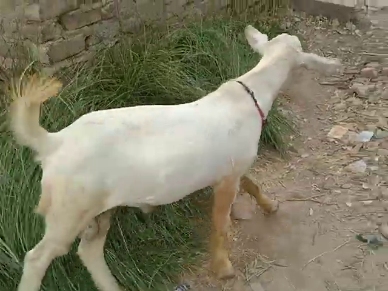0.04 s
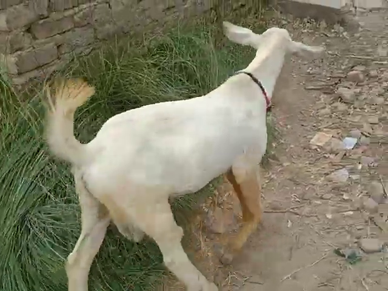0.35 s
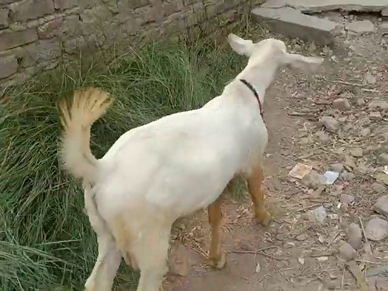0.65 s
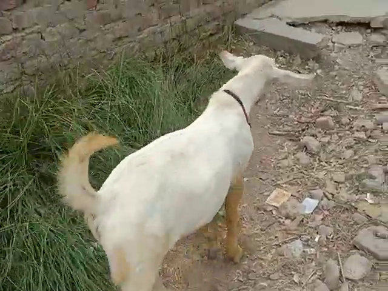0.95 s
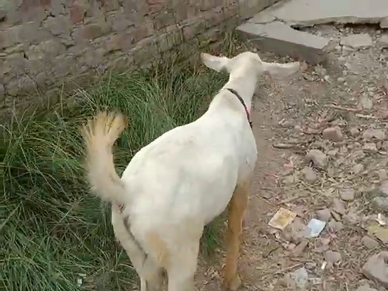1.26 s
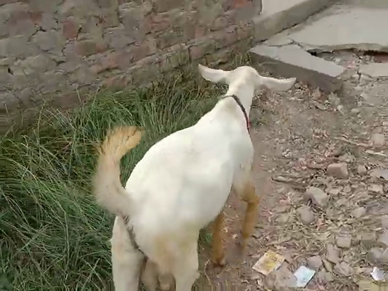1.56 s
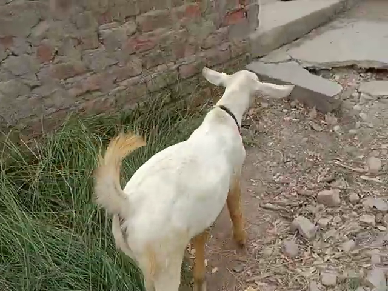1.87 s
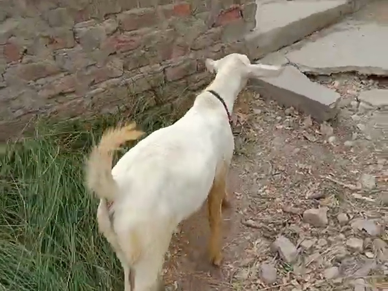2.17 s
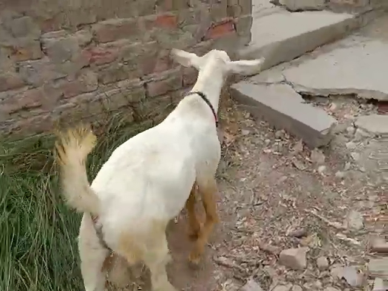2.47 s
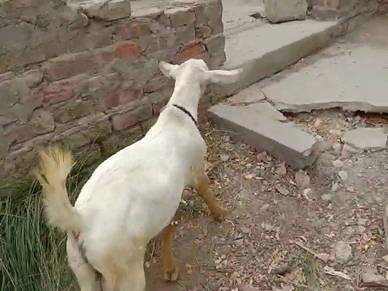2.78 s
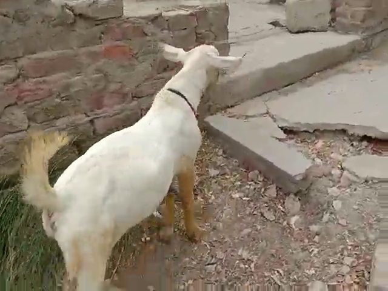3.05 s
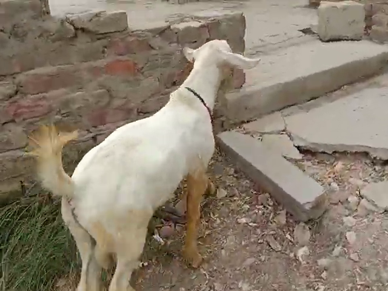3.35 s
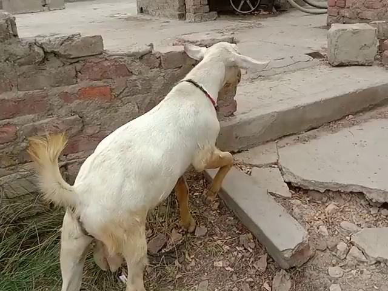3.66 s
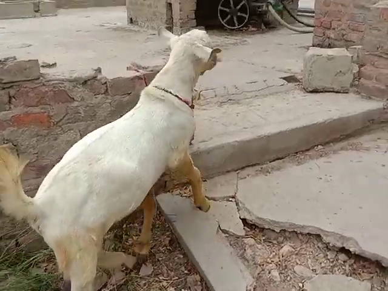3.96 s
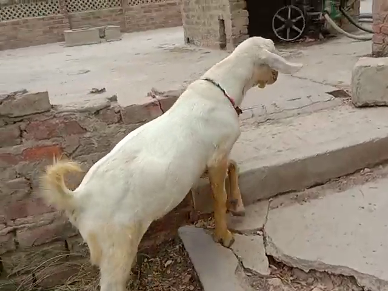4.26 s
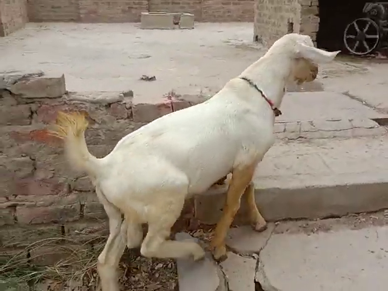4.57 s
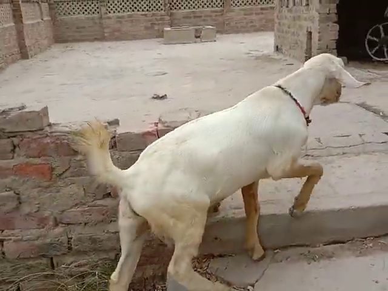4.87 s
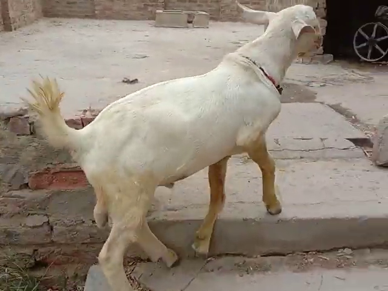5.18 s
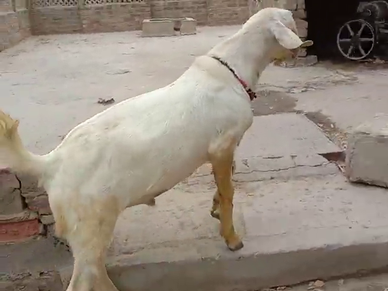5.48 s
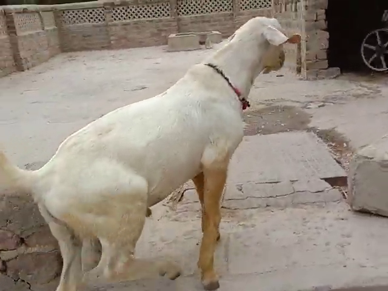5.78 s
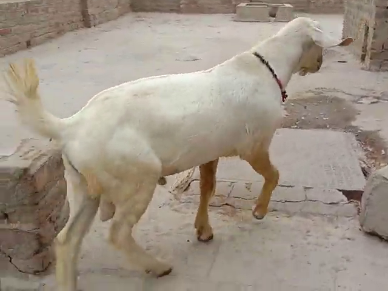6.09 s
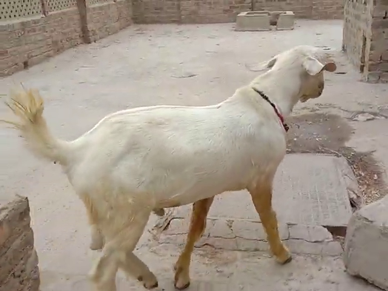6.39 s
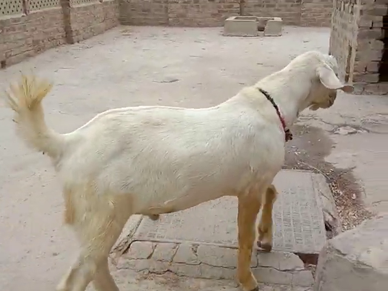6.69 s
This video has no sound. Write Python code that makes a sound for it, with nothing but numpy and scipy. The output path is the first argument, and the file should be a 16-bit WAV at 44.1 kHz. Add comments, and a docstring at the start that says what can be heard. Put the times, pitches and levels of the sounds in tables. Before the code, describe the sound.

A distant engine chugs steadily and grows louder, with light gritty hoof steps, a few bird chirps and wind buffeting the microphone late on.

```python
"""A walled yard, where a slow single-cylinder engine chugs: a hard firing stroke, then a softer return.
Each stroke barks through the exhaust pipe and makes the ironwork clank. A goat walks through grass and
rubble onto concrete, rustling dry litter and snapping grit. Small birds chirp, and a hoarse far call
sounds now and then. Wind touches the microphone, then buffets it hard as the yard opens out."""
import sys
import numpy as np
from scipy import signal
from scipy.fft import rfft, irfft, next_fast_len
from scipy.io import wavfile
from scipy.ndimage import uniform_filter1d, minimum_filter1d, map_coordinates

SR = 44100
rng = np.random.default_rng(int(sys.argv[2]) if len(sys.argv) > 2 else 0)


def wav_record(signal):
    """Record a signal, one row per channel, as 16-bit PCM in the file named by sys.argv[1]."""
    frames = np.transpose(np.atleast_2d(signal))
    bounded = np.clip(frames, -1, 1)
    # unit amplitude maps onto the largest positive 16-bit level
    quanta = np.round(bounded * 32767).astype(np.int16)
    wavfile.write(sys.argv[1], SR, quanta)


N = 296793


def amp(db):
    """Turn decibels into a number to multiply by."""
    return 10 ** (np.asarray(db) / 20)


def unit(x):
    """Scale x to an average strength (rms) of 1."""
    return x / np.sqrt(np.mean(x ** 2) + 1e-20)


def unit_start(x):
    """Scale x so its first 25 ms have an average strength of 1."""
    return x / np.sqrt(np.mean(x[:SR // 40] ** 2))


def add(track, s, x):
    """Mix x into the track, starting at s seconds."""
    start = round(s * SR)
    x, start = x[max(-start, 0):], max(start, 0)
    track[start:start + len(x)] += x[:len(track[start:])]


def curves(rows):
    """Join timed rows with straight lines: one curve for each column after the time."""
    times, *columns = np.transpose(rows)
    return [np.interp(np.arange(N) / SR, times, column) for column in columns]


def wobble(rate):
    """A smooth curve through `rate` random values a second."""
    return map_coordinates(rng.standard_normal(int(N * rate / SR) + 4), [np.arange(N) * rate / SR])


def swells(rows, rise_s, fall_s):
    """A volume curve that rises, holds and falls for each row, moving 20 dB in the given times."""
    t, power = np.arange(N) / SR, np.zeros(N)
    for s, length, db in rows:
        away = np.maximum(s - t, 0) / rise_s + np.maximum(t - s - length, 0) / fall_s
        near = away < 4
        power[near] += amp(db - 20 * away[near]) ** 2
    return np.sqrt(power)


def filtered(x, response):
    """Multiply each frequency in x by response(frequency)."""
    size = next_fast_len(len(x) + SR // 10)
    return irfft(rfft(x, size) * response(np.fft.rfftfreq(size, 1 / SR)), size)[:len(x)]


def coloured(x, spectrum):
    """Shape the tone of x with (Hz, dB) points, at strength 1."""
    points_hz, db = np.transpose(spectrum)
    return unit(filtered(x, lambda hz: amp(np.interp(np.log(hz + 1), np.log(points_hz), db))))


def noise(spectrum):
    """Noise with the given tone, at strength 1."""
    return coloured(rng.standard_normal(N), spectrum)


def band(x, lo_hz, hi_hz, order):
    """Keep what lies between two frequencies; a higher order cuts more sharply."""
    return signal.sosfilt(signal.butter(order, [lo_hz, hi_hz], 'band', fs=SR, output='sos'), x)


def ring(x, modes):
    """Make x ring at each mode: a (pitch, width, dB) note that an object favours."""
    return filtered(x, lambda f: sum(
        amp(db) * (1j * f * width / (hz * hz - f * f + 1j * f * width)) ** 2 for hz, width, db in modes))


def varied(modes, spread_db):
    """The same ringing notes, each made louder or softer by chance."""
    modes = np.array(modes, float)
    modes[:, 2] += spread_db * rng.standard_normal(len(modes))
    return modes


def patchy(x, depth_db):
    """Turn small random patches of pitch and time up or down."""
    grid = signal.stft(x, nperseg=512)[2]
    patches = uniform_filter1d(rng.standard_normal(grid.shape), size=3, axis=0)
    patches = uniform_filter1d(patches, size=11, axis=1)
    return signal.istft(grid * amp(depth_db * unit(patches)), nperseg=512)[1][:N]


def burst(t60, tail_db, tail_t60, hold_s=0):
    """A puff of noise and its weaker scatter off walls and ground; t60 is seconds to fade by 60 dB."""
    t = np.maximum(np.arange(SR // 3) / SR - hold_s, 0)
    return rng.standard_normal(len(t)) * np.hypot(amp(-60 * t / t60), amp(tail_db - 60 * t / tail_t60))


# The notes the exhaust pipe rings at. Each row: pitch in Hz, width in Hz,
# relative level in dB when firing, relative level in dB on the return.
EXHAUST_MODES = [(368, 125, -11.5, -12.5), (718, 44, 1, 9), (822, 27, -3, -2.5), (987, 150, 1.5, 2),
                 (1112, 180, 0, -7), (1244, 107, -1, 9), (1336, 68, 3, 3.5), (1540, 61, -5, -16.5),
                 (1737, 190, -6.5, 2.5)]

def exhaust_bark(puff, firing, bright_db):
    """A puff of gas rings the pipe; some strokes bark low, some high."""
    modes = varied(np.array(EXHAUST_MODES)[:, [0, 1, 2 if firing else 3]], spread_db=3.5)
    tilt_db = rng.normal(bright_db, 1.5)
    modes[:, 2] += tilt_db * np.interp(modes[:, 0], [1000, 1350], [-1, 1])
    return unit_start(band(ring(puff, modes), 260, 1740, order=3))


# The notes the ironwork rings at. Each row: pitch in Hz, width in Hz, relative level in dB.
IRON_MODES = [(2381, 194, -2), (2850, 230, -10), (3184, 220, -2.5), (3487, 300, -2.5), (3893, 210, -5.5),
              (4708, 370, 0.5), (4816, 280, 0.5), (5690, 466, 6.5), (6056, 580, 2.5), (6680, 1900, -22)]

def iron_clank(t60, rise_s, shelter, lift_db):
    """A jolt rings the iron, with a high fizz. Behind the wall it starts softer and lasts longer."""
    jolt = burst(t60, tail_db=-15.5 + 12 * shelter, tail_t60=0.17 + 0.027 * shelter,
                 hold_s=0.00074 + 0.013 * shelter)
    t = np.arange(len(jolt)) / SR
    jolt *= 1 - np.exp(-t / (rise_s * (1 + 3 * shelter)))
    echo_s = round(0.011 * SR) / SR  # off the nearest wall
    jolt += amp(-7) * np.interp(t - echo_s, t, jolt, left=0)
    modes = varied(IRON_MODES, spread_db=4)
    modes[:, 2] += lift_db * np.interp(modes[:, 0], [2400, 3200, 4000, 4600], [0.86, 1, 0.67, 0.065])
    clank = unit_start(band(ring(jolt, modes), 2280, 7570, order=4))
    fizz = unit_start(band(jolt, 12400, 15800, order=3))
    return clank + amp(-12 - 0.5 * lift_db - 7 * shelter) * fizz


def iron_rattle():
    """The iron's lower notes keep rattling between strokes."""
    modes = [(hz, 0.51 * width, 0) for hz, width, _ in IRON_MODES if hz < 4300]
    return unit(patchy(ring(rng.standard_normal(N), modes), depth_db=5))


# The wall hides the engine at first, so more of its sound arrives scattered. Each row: time in seconds,
# shelter from 0 (open) to 1 (hidden), lift of the low iron notes in dB, extra clank in dB.
WALL_SHELTER = [(0, 1, -7, 0), (2.3, 0.6, 2, -1.5), (3.0, 0.36, -4, 2.5), (4.1, 0.15, 2, -3.5),
                (4.9, 0.11, 0, 1), (5.4, 0.1, 9.5, 0), (5.9, 0.3, 3, -4.5), (6.7, 0.08, 8.5, 1.5)]

def strokes(times, level_db, bright_db, firing, bark_db, clank_db, puff_t60, clank_t60, tail_db, rise_s):
    """Each stroke puffs through the exhaust and jolts the ironwork; the yard scatters both."""
    out = np.zeros(N)
    wall_times, *wall_columns = np.transpose(WALL_SHELTER)
    for s in times:
        now = np.clip(round(s * SR), 0, N - 1)
        shelter, lift_db, extra_db = [np.interp(s, wall_times, column) for column in wall_columns]
        bark_gain, clank_gain = amp(rng.normal(level_db[now], 0.8, size=2))  # no two strokes alike
        puff = burst(puff_t60, tail_db, tail_t60=0.26, hold_s=0.0016 + 0.021 * shelter)
        bark = amp(bark_db) * exhaust_bark(puff, firing, bright_db[now])
        clank = amp(clank_db + extra_db) * iron_clank(clank_t60, rise_s, shelter, lift_db)
        add(out, s, bark_gain * bark + clank_gain * clank)
    return out


# The engine grows louder as the yard opens out. Each row: time in seconds, relative level in dB of
# the firing stroke, the same for the return stroke, brightness of the bark in dB.
ENGINE_LEVELS = [(0, -38, -49.5, 6), (.5, -40.5, -47, 5.5), (.8, -43.5, -42.5, 0), (1.3, -35, -52, 0.5),
                 (1.62, -39.5, -43.5, -2), (1.9, -35.5, -48, -3.5), (2.2, -34.5, -40, 1.5),
                 (2.45, -32.5, -63.5, 1.5), (2.7, -28.5, -27.5, -2), (2.97, -27.5, -46, 2.5),
                 (3.5, -23, -33, 1.5), (3.8, -24.5, -37, -0.5), (4.06, -16.5, -28, -1),
                 (4.5, -19.5, -26, 2), (4.9, -20.5, -31, -2.5), (5.4, -21, -16, -1), (6, -27, -25, -1),
                 (6.73, -11.5, -13.5, -0.5)]
FIRING_AT_S, CYCLE_S = 0.243, 0.2729

def engine():
    """A steady beat: a hard firing stroke, then a softer, longer return stroke half a cycle later."""
    firing_db, return_db, bright_db = curves(ENGINE_LEVELS)
    beats = np.arange(FIRING_AT_S - CYCLE_S, N / SR, CYCLE_S)
    firings = strokes(beats, firing_db, bright_db, firing=True, bark_db=-7, clank_db=-10.5,
                      puff_t60=0.16, clank_t60=0.022, tail_db=-11.5, rise_s=0.0019)
    returns = strokes(beats + CYCLE_S / 2, return_db, bright_db, firing=False, bark_db=-5.5,
                      clank_db=-12.5, puff_t60=0.19, clank_t60=0.041, tail_db=-2.5, rise_s=0.0025)
    return firings + returns + amp(firing_db - 39) * iron_rattle()


# The yard's murmur, grass hiss and litter crackle, as coloured by the microphone.
# Each row: frequency in Hz, relative level in dB.
MURMUR_THROUGH_MIC = [(25, -35.5), (70, 12), (150, -8.5), (350, 6), (520, -19.5), (720, -22), (1300, 5),
                      (1550, -9), (1850, 3), (2150, -30.5), (3400, -5.5), (4200, -38), (8000, -30)]
GRASS_THROUGH_MIC = [(2000, -13), (4200, -42), (4800, -11), (5500, 4), (6100, 1.5), (6900, 0),
                     (7500, -15.5), (9000, -18), (10500, -16.5), (12000, -98), (16000, -34)]
LITTER_THROUGH_MIC = [(3000, -19.5), (6000, -21.5), (7500, -11.5), (9000, -18.5), (11000, -11), (13000, -5),
                      (15200, 3), (16000, -14)]
# The constant stir on the ground. Each row: time in seconds, grass level in dB, litter level in dB.
GROUND_LEVELS = [(0, -55.5, -84), (1.85, -55, -75), (2.25, -55, -60), (2.68, -54, -59), (3.0, -49, -78),
                 (3.38, -52.5, -60), (3.6, -48, -48), (4.25, -44.5, -51), (4.9, -49, -51.5),
                 (5.35, -42.5, -43), (5.7, -49.5, -53), (6.35, -48, -55.5), (6.73, -37.5, -62)]
# The goat brushes through litter, and grass blades swish.
# Each row: start in seconds, length in seconds, level in dB.
LITTER_RUSTLES = [(0, 0.024, -42.5), (.17, 0.11, -49.5), (.62, 0.14, -55), (1.3, 0.11, -59),
                  (1.52, 0.12, -53), (1.96, .07, -57.5), (2.22, 0.22, -46), (2.82, 0.29, -45.5),
                  (4.24, 0.16, -42)]
GRASS_SWISHES = [(.32, 0.062, -49)]

def ground():
    """Grass hisses and dry litter crackles in clumps over the murmur of the yard."""
    grass_db, litter_db = curves(GROUND_LEVELS)
    grass = amp(grass_db + 1.5 * wobble(18)) * patchy(noise(GRASS_THROUGH_MIC), depth_db=3.6)
    murmur = patchy(noise(MURMUR_THROUGH_MIC), depth_db=3.5)
    crackle = rng.standard_normal(N) * amp(2.2 * wobble(900) + 3.4 * wobble(45))
    shifting = amp(litter_db + 4.5 * np.tanh(wobble(12)))
    brushing = swells(LITTER_RUSTLES, rise_s=0.05, fall_s=0.096)
    litter = np.hypot(shifting, brushing) * coloured(crackle, LITTER_THROUGH_MIC)
    blades = unit(ring(rng.standard_normal(N), [(5440, 420, 0)]))
    swish = swells(GRASS_SWISHES, rise_s=0.14, fall_s=0.055) * blades
    return swish + grass + amp(0.2) * litter + amp(-65) * murmur


def eddies(spectrum, evenness, window):
    """Swirling air: noise whose swells are partly evened out over `window` samples."""
    pressure = noise(spectrum)
    power = np.abs(uniform_filter1d(pressure ** 2, window)) + 1e-6
    return unit(pressure / power ** (evenness / 2))


# The steady wind. Each row: time in seconds, relative level in dB.
WIND_LEVELS = [(0, -63), (1.2, -58.5), (1.7, -62.5), (2.75, -67), (2.95, -47), (3.45, -53), (3.58, -32),
               (4.42, -41.5), (4.53, -42.5), (4.9, -32.5), (5.36, -26), (5.48, -7.5), (6.2, -13),
               (6.73, -14)]
# Gusts on top of it. Each row: start in seconds, length in seconds, relative level in dB.
WIND_GUSTS = [(.5, 0.053, -51), (.66, 0.054, -46), (.86, 0.042, -42), (1.1, 0.012, -40), (2.17, 0.095, -52),
              (2.44, 0.027, -45), (2.855, 0.041, -44), (2.98, 0.033, -47), (3.205, 0.068, -35.5),
              (3.575, 0.059, -26), (3.73, .03, -32.5), (3.95, 0.036, -32.5), (4.11, 0.01, -32.5),
              (4.24, 0.093, -28), (4.37, 0.093, -29), (4.79, 0.043, -28), (4.96, 0.064, -15),
              (5.03, 0.09, -6), (5.135, 0.051, -1), (5.286, 0.032, -7), (5.415, 0.052, -10.5),
              (5.485, 0.099, 6.5), (5.745, 0.14, -3), (5.965, 0.091, -7), (6.23, 0.2, -4.5),
              (6.505, 0.039, -7), (6.634, .03, -11)]
# The tone of slow air, fast air and small swirls. Each row: frequency in Hz, relative level in dB.
SWAY_TONE = [(20, -30), (40, -15), (65, 0.5), (100, 6.5), (160, 0), (240, -13), (400, -49), (900, -65)]
BUFFET_TONE = [(20, -56), (35, -34), (55, -11), (80, -1.5), (115, 2), (170, -0.5), (250, -5), (350, -13),
               (600, -36), (1200, -94)]
FLUTTER_TONE = [(100, -28), (200, -2), (300, 2), (450, -4), (650, -10.5), (1000, -16), (1400, -25.5),
                (1800, -35), (2300, -57.5), (3500, -56.5), (6000, -91)]
CALM_DB, GALE_DB = -42, 0.5  # wind levels that count as slow and as fast air

def wind():
    """Slow air sways the microphone in deep thumps; fast air buffets it higher and sheds small swirls."""
    steady = amp(curves(WIND_LEVELS)[0] + 3.65 * wobble(26))
    gusts = swells(WIND_GUSTS, rise_s=0.026, fall_s=0.042)
    wind_db = 20 * np.log10(np.hypot(steady, gusts))
    speed = np.clip((wind_db - CALM_DB) / (GALE_DB - CALM_DB), 0, 1)
    fast_share = np.clip(1.7 * speed, 0, 1)
    sway = np.sqrt(1 - fast_share) * eddies(SWAY_TONE, evenness=0.75, window=1500)
    buffet = np.sqrt(fast_share) * eddies(BUFFET_TONE, evenness=0.7, window=1500)
    lumps = wobble(70)
    rumble = amp(wind_db - 1.5 + 2.05 * lumps) * (sway + buffet)
    # large swirls feed the small ones, and more so in fast air
    flutter_db = wind_db - 19.5 + 13 * speed ** 1.6
    flutter = amp(flutter_db + 3.9 * lumps) * eddies(FLUTTER_TONE, evenness=0.63, window=1000)
    return rumble + flutter


# Small birds. Each row: middle of the chirp in seconds, pitch there in Hz,
# pitch slide in Hz per second, peak level in dB.
BIRD_CHIRPS = [(0.916, 5800, -8000, -40), (1.032, 5800, -30000, -44.5), (1.139, 6300, 25000, -45),
               (1.267, 6050, -20000, -45.5), (1.567, 6050, 4981, -40), (3.129, 4450, 8000, -43),
               (3.145, 6100, -50000, -40), (3.221, 6100, 35000, -33), (5.983, 4980, 6007, -26)]

def birds(length_s=0.017):
    """Each chirp is a brief high whistle that slides fast and wavers roughly."""
    out, t = np.zeros(N), np.arange(-SR // 20, SR // 20) / SR
    for s, hz, slide, db in BIRD_CHIRPS:
        waver_hz = 250 * unit(uniform_filter1d(rng.standard_normal(len(t)), size=50))
        phase = 2 * np.pi * np.cumsum(hz + slide * t + waver_hz) / SR
        fade = np.exp(-(2 * t / length_s) ** 2)
        add(out, s + t[0], amp(db) * fade * np.sin(phase))
    return out


# Far calls. Each row: start in seconds, length in seconds, top pitch in Hz, level in dB.
HOARSE_CALLS = [(1.32, 0.32, 1910, -48), (2.7, 0.29, 1870, -58.5), (5.33, .12, 1966, -41.5)]

def far_calls(arch_hz=192.6):
    """A hoarse call: a narrow band of noise that rises in pitch, then falls."""
    out, t = np.zeros(N), np.arange(N) / SR
    rasp = (wobble(450) + 1j * wobble(450)) * amp(2.5 * wobble(60))
    for s, length, top_hz, db in HOARSE_CALLS:
        from_middle = np.clip(2 * (t - s) / length - 1, -1, 1)
        hz = top_hz - arch_hz * from_middle ** 2
        voice = unit(np.real(rasp * np.exp(2j * np.pi * np.cumsum(hz) / SR)))
        out += swells([(s, length, db)], rise_s=0.034, fall_s=0.082) * voice
    return out


# Hooves on grit and straw. Each row: start in seconds, relative levels in dB of the tick and the crunch.
HOOF_STEPS = [(1.6053, -26, -30), (2.1122, -41, -28.5), (2.2682, -23.5, -33), (2.3332, -21, -25),
              (2.3399, -32, -22), (3.0947, -25, -24.5), (3.1576, -22.5, -20), (3.13, -25, -23),
              (3.3942, -21, -35), (3.4695, -18, -43), (3.7356, -21, -25.5), (3.919, -16, -25),
              (4.115, -17, -27), (4.128, -15.5, -25), (4.3823, -17, -22), (4.803, -23, -21.5),
              (4.8539, -22, -30), (4.962, -16, -27.5), (5.2505, -15, -24), (5.3144, -16, -37),
              (5.7408, -15, -27), (5.7668, -16, -37), (5.9568, -22, -19), (6.1335, -15.5, -20.5)]

def hooves(stones=10):
    """Grit snaps under the hooves: a thin tick, a spray of smaller ones and a short crunch."""
    out = np.zeros(N)
    # loose stones also shift at random between the steps
    stone_times = rng.uniform(2.2, 6.3, size=stones)
    stone_db = rng.normal([-28, -37], 3, size=(stones, 2))  # tick, crunch
    for s, tick_db, crunch_db in np.vstack([HOOF_STEPS, np.column_stack([stone_times, stone_db])]):
        grains = np.repeat(amp(5 * rng.standard_normal(SR // 150)), 50)
        tick = band(burst(0.0053, tail_db=-16.5, tail_t60=0.08) * grains, 12800, 16900, order=2)
        crunch = band(burst(0.0072, tail_db=-11.5, tail_t60=0.15), 4760, 6620, order=3)
        add(out, s, amp(tick_db - 3) * tick / np.abs(tick).max())
        add(out, s, amp(crunch_db - 3) * crunch / np.abs(crunch).max())
    return out


# Single slaps of air. Each row: start in seconds, relative level in dB.
AIR_SLAPS = [(5.078, -2.5), (5.145, -9), (5.179, 3.5), (5.283, 8), (5.495, 14), (5.543, 16), (5.832, 10.5),
             (5.862, 8.5), (5.97, 6.5), (6.224, -6.5), (6.354, 8)]

def air_slaps():
    """A sudden push of air hits the microphone with a low thud."""
    out = np.zeros(N)
    for s, db in AIR_SLAPS:
        push = burst(0.08, tail_db=-9, tail_t60=0.16)
        thud = band(ring(push, [(121, 210, 5), (342, 780, -5.5)]), 47, 1150, order=3)
        add(out, s, amp(db - 7) * thud / np.abs(thud).max())
    return out


def scene():
    """All the sounds meet at one microphone."""
    return (engine() + wind() + air_slaps() + ground() + hooves() + far_calls() + birds())[None]


DUCK_ABOVE_DB, DUCK_DB_PER_DB, DUCK_REACTION_S = -29, 0.41, 0.024

def record(dry, ceiling=0.8, top_hz=15650):
    """Loud rumble turns everything down, a limiter catches the peaks, and the highest treble is cut."""
    memory = np.exp(-1 / (DUCK_REACTION_S * SR))
    rumble = band(dry[0], 30, 610, order=2)
    rumble_db = 10 * np.log10(signal.lfilter([1 - memory], [1, -memory], rumble ** 2) + 1e-12)
    ducked = dry[0] * amp(-DUCK_DB_PER_DB * np.maximum(rumble_db - DUCK_ABOVE_DB, 0))
    safe_gain = np.minimum(1, ceiling / (np.abs(ducked) + 1e-9))
    limited = ducked * uniform_filter1d(minimum_filter1d(safe_gain, size=700), size=400)
    return filtered(limited, lambda hz: 1 / (1 + (hz / top_hz) ** 200))[None]


dry = scene()
out = record(dry)
wav_record(out)
```